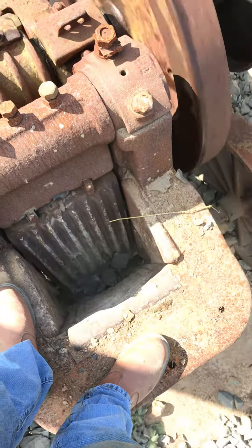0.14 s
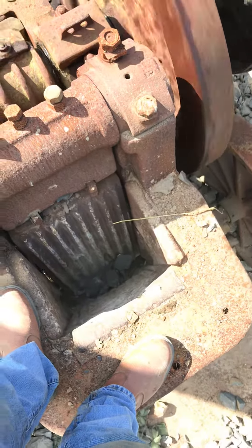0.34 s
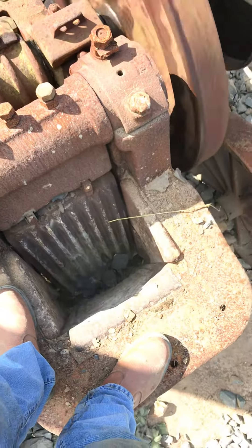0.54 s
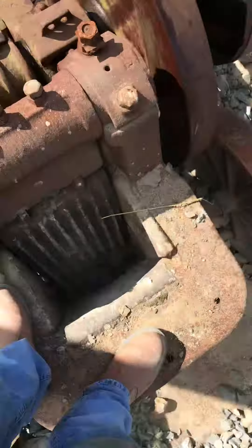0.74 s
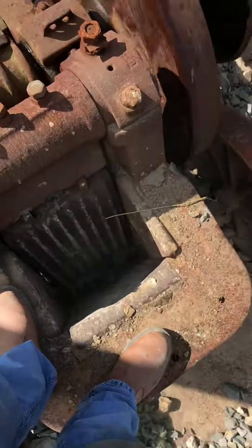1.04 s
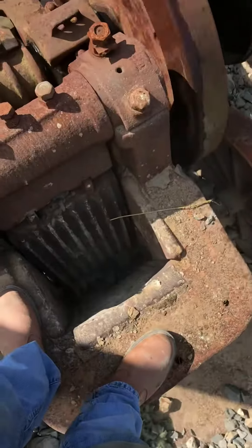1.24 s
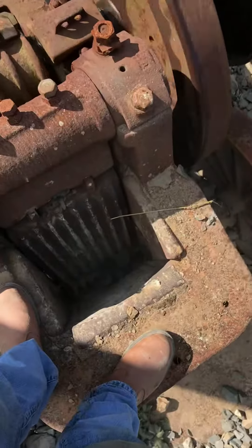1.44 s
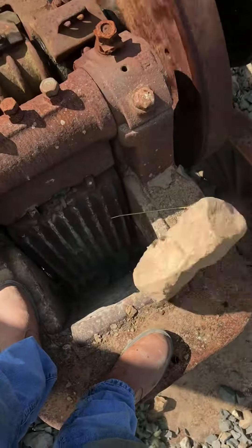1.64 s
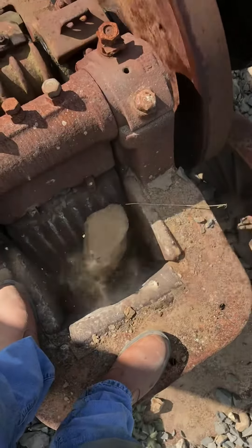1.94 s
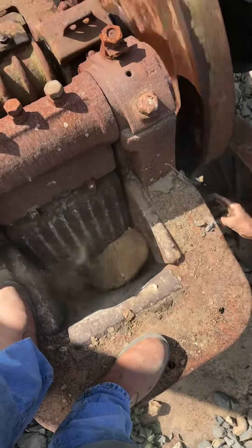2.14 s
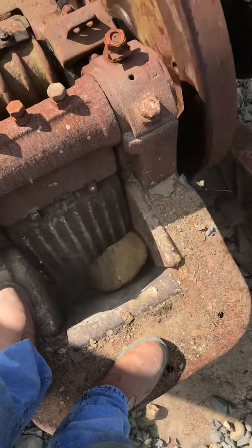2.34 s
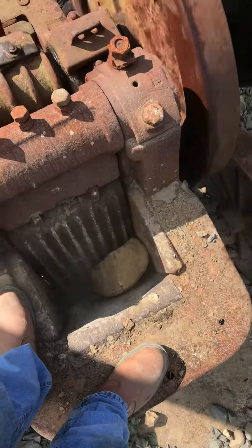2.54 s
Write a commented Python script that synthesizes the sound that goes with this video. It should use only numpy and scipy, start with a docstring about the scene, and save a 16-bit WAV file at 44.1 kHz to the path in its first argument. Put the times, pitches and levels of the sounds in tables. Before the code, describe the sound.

A jaw crusher pounds rock close by outdoors, dry, while a slow engine knocks five times a second over low rumble. Gritty crunches and iron thuds come near 0.2, 0.5, 0.86 (loudest, with growling rock slips), 1.15 and 1.48 s. From 1.7 to 2.1 s a thrown stone knocks and bounces hollowly, chips ticking. A heavy blow lands at 2.4 s, then softer grinding.

```python
"""Jaw crusher and slow engine

A jaw crusher runs outdoors, close by; its one-cylinder engine knocks and thumps five times a second.
About three times a second the jaw closes: grit grinds, rock slips, cracks and thuds in the iron frame,
and chips fly off. A thrown stone bounces down between the plates. Sources are damped modes, shaped noise
and short tones. The loudest blows drive the gain down and meet a fast limiter."""
import sys
import numpy as np
from scipy import signal
from scipy.fft import rfft, irfft, next_fast_len
from scipy.io import wavfile
from scipy.ndimage import uniform_filter1d, minimum_filter1d, map_coordinates

SR = 44100
rng = np.random.default_rng(int(sys.argv[2]) if len(sys.argv) > 2 else 0)


def master(y):
    """Save y as 16-bit WAV."""
    cut = np.clip(np.atleast_2d(y).T, -1, 1)
    pcm = np.round(cut * 32767)  # scale
    wavfile.write(sys.argv[1], SR, pcm.astype(np.int16))


N = 119070
T = np.arange(int(.3 * SR)) / SR  # time axis of one hit, s

# All levels are ahead of the microphone gain.
# drive hum: pitch_hz, level_db
HUM_TONES = [(112, -40.5)]
# rumble spectrum: freq_hz, gain_db
RUMBLE_SPECTRUM = [(24, -57), (48, 16.5), (100, 15.5), (160, 8.5), (400, 8), (750, 2), (2500, -18),
                   (7000, -25.5), (15500, -19.5)]
HUM_WAVER_HZ = 1.4
RUMBLE_DB, RUMBLE_SWAY_DB = -33.5, 3

# engine firings: start_s
FIRINGS = [0.102, .304, 0.507, 0.711, .911, 1.111, 1.311, 1.512, 1.712, 1.910, 2.106, 2.302, 2.499, 2.691]
# engine block modes: pitch_hz, level_db
BLOCK_MODES = [(614, 6), (795, 1), (950, -9), (1560, -13.5), (1810, -4.5), (2340, -9), (2930, -9),
               (3220, -7), (3460, -12.5), (4690, -14.5)]
# engine clatter spectrum: freq_hz, gain_db
CLATTER_SPECTRUM = [(100, 18), (300, 8), (800, 8), (1400, 3), (4800, -8), (8000, -13), (15000, -60)]
# exhaust puff and its reflection: delay_s (after firing), width_s, level_db
PUFFS = [(0.0226, 0.0018, -16), (0.033, 0.0027, -16)]
BLOCK_DB, BLOCK_T60_S = -23.5, 0.14
CLATTER_DB, CLATTER_T60_S = -20.5, 0.15

# jaw closings: middle_s, half_width_s (to 1/e), grinding_db
BITES = [(0.213, 0.05, -30), (0.537, 0.049, -28.5), (0.86, 0.046, -29), (1.145, 0.045, -30),
         (1.486, 0.043, -28.5), (1.818, 0.078, -34), (2.413, 0.06, -31.5), (2.70, 0.086, -38)]
GRIT_PER_S, GRIT_SPREAD_DB = 910, 6
IDLE_GRIT_DB, GROAN_DB = -43.5, 8  # groan re grit

# rock slipping on the plates: start_s, level_db, pitch_hz, swell_s (to peak)
SLIPS = [(.458, -18.5, 414, 0.0051), (.480, -10.5, 428, 0.0094), (0.504, -8, 433, .012),
         (.528, -15, 248, 0.013), (.781, -25.5, 405, 0.011), (.817, -11.5, 448, 0.0043),
         (.836, -5, 237.5, 0.018), (1.444, -14.5, 406, 0.0083)]
SLIP_WAVER_SHARE, SLIP_OVERTONE_DB = 0.07, -17.5

# flying chips: start_s, level_db, pitch_hz
CHIPS = [(0.174, -34, 7400), (0.822, -27, 14000), (0.925, -31, 5900), (0.975, -37.5, 5940),
         (1.256, -26.5, 9300), (1.815, -28, 5320), (2.1025, -18, 4480), (2.195, -34, 3560),
         (2.606, -19.5, 4510)]
CHIP_OCTAVES, CHIP_T60_S, CHIP_PING_DB = 1, 0.014, -5.5  # ping re tick

# thrown stone's contacts: start_s, knock_db, pitch_hz, crack_db
BOUNCES = [(1.7141, -12, 770, -25.5), (1.815, -17.5, 462, -27.5), (1.848, -11, 414, -21),
           (1.852, -7, 1018, -10.5), (1.932, -15.5, 565, -32), (1.9615, -13, 751, -26),
           (2.0249, -10, 720, -33), (2.046, -21, 825, -49), (2.0801, -9.5, 955, -31.5),
           (2.1035, -12.5, 776, -19)]
# stone knock partials: pitch_ratio, level_db
KNOCK_PARTIALS = [(.36, -2), (.62, -5), (1, 3), (1.35, -4), (1.8, -14.5)]
KNOCK_DECAY_S = 0.0015  # time constant
KNOCK_FRAME_DB, CONTACT_DB = -2.5, -21  # re knock

# jaw blows on rock: start_s, thud_db, thud_centre_hz, crack_db
BLOWS = [(.165, -15.5, 505, -21.5), (.182, -13, 318, -15), (.206, -19, 543, -13.5),
         (.219, -12.5, 660, -7.5), (0.2349, -16.5, 300, -15), (.461, -20.5, 900, -29.5),
         (.514, -12, 880, -21.5), (.578, -19, 290, -16.5), (.633, -27, 750, -60), (.843, -8.5, 470, -24.5),
         (.860, 0.5, 470, -15.5), (.872, -7, 775, -16), (1.137, -7, 305, -13.5), (1.163, -9, 452, -14.5),
         (1.170, -13.5, 690, -16), (1.193, -9, 340, -25.5), (1.4737, -12, 468, -20),
         (2.127, -13.5, 294, -31), (2.3754, -4, 298, -13), (2.383, -6.5, 970, -22), (2.405, -11, 600, -18)]
# crusher frame modes: pitch_hz, level_db
FRAME_MODES = [(178, -14), (220, 2.5), (247, 3), (290, -11), (352, -3), (392, -4), (432, -4.5), (525, -21),
               (690, -9.5), (812, -8), (1240, -15.5), (1385, -8)]
# crack spectrum: freq_hz, gain_db
CRACK_SPECTRUM = [(60, -11), (700, 5), (2000, 4), (3000, -2), (4500, -0.5), (8000, -10), (15500, -8)]
FRAME_T60_S = 0.086
THUD_OCTAVES, THUD_RISE_S = 1, 0.00059
THUD_NOISE_DB, THUD_NOISE_T60_S = -2.5, 0.14
CRACK_T60_S, CRACK_TAIL_DB, CRACK_TAIL_T60_S = 0.003, -1, 0.046
CRACKLE_DB, CRACKLE_PER_S = 5.5, 800
SHARD_RIPPLE_DB, SHARD_RIPPLE_HZ = 3.5, 280

MIC_DIP_HZ, MIC_DIP_SHARE, MIC_DIP_OCTAVES = 10690, 0.49, 0.12  # treble hollow
MIC_GAIN_DB = 2.5
DUCK_ABOVE_RMS, DUCK_SLOPE = 0.25, 0.36  # slope: dB of cut per dB over
DUCK_S_PER_NEPER = 1  # recovery of the held excess
LIMITER_SAMPLES, TOP_HZ = 65, 15900


def amp(db):
    """Decibels to amplitude."""
    return 10 ** (np.asarray(db) / 20)


def unit(x):
    """Scale to rms 1."""
    return x / np.sqrt(np.mean(x ** 2) + 1e-20)


def burst(x):
    """Scale a hit to the energy of 10 ms at rms 1."""
    return x / np.sqrt(np.sum(x ** 2) / (.01 * SR) + 1e-20)


def fade(t60_s):
    """Exponential decay, 60 dB in t60_s."""
    return np.exp(-np.log(1000) * T / t60_s)


def colour(points):
    """Gain over frequency through (Hz, dB) points."""
    freq_hz, gain_db = np.transpose(points)
    return lambda hz: amp(np.interp(np.log(hz + 1), np.log(freq_hz), gain_db))


def bell(centre_hz, octaves):
    """Gain of a hump around a frequency."""
    return lambda hz: 1 / (1 + (np.log2((hz + 1) / centre_hz) / octaves) ** 2 / 2) ** 3


def shard(gain):
    """Each piece of rock adds its own random resonances to a spectrum."""
    knots = rng.standard_normal(256)

    def rippled(hz):
        ripple = map_coordinates(knots, [hz / SHARD_RIPPLE_HZ], mode="wrap")
        return gain(hz) * amp(SHARD_RIPPLE_DB * np.minimum(hz / 2000, 1) * ripple)
    return rippled


def filtered(x, gain):
    """Apply a gain over frequency."""
    m = next_fast_len(len(x) + 4096)
    return irfft(rfft(x, m) * gain(np.fft.rfftfreq(m, 1 / SR)), m)[:len(x)]


def noise(gain, size):
    """Coloured noise of rms 1."""
    return unit(filtered(rng.standard_normal(size), gain))


def wobble(knots_per_s):
    """Smooth random curve through normal knots."""
    return map_coordinates(rng.standard_normal(200), [np.arange(N) * knots_per_s / SR], mode="wrap")


def add(track, start_s, sound):
    """Mix a sound into a track."""
    part = track[max(round(start_s * SR), 0):][:len(sound)]
    part += sound[:len(part)]


def ring(modes, t60_s, weight, blur):
    """Damped modes with varied strike levels; rattling contact blurs each by a share of its pitch."""
    hz, db = np.transpose(modes)
    gains = amp(db + rng.normal(0, 2, len(hz))) * weight(hz)
    steps = rng.standard_normal((len(hz), len(T))) * np.sqrt(2 * np.pi * blur * hz[:, None] / SR)
    phases = rng.uniform(0, 2 * np.pi, (len(hz), 1)) + np.cumsum(steps, axis=1)
    return gains @ (np.sin(2 * np.pi * hz[:, None] * T + phases) * fade(t60_s))


def thud(centre_hz):
    """The frame rings around the frequency that the contact favours."""
    weight = bell(centre_hz, THUD_OCTAVES)
    dense = burst(noise(weight, len(T)) * fade(THUD_NOISE_T60_S))
    modes = burst(ring(FRAME_MODES, FRAME_T60_S, weight, blur=0.0029))
    rise = 1 - np.exp(-T / THUD_RISE_S)
    return burst((modes + amp(THUD_NOISE_DB) * dense) * rise)


def crack():
    """Rock snaps, and its splinters crackle on briefly in the jaw chamber."""
    splinters = unit(amp(CRACKLE_DB * wobble(CRACKLE_PER_S)[:len(T)]))
    tail = amp(CRACK_TAIL_DB) * splinters * fade(CRACK_TAIL_T60_S)
    return burst(noise(shard(colour(CRACK_SPECTRUM)), len(T)) * (fade(CRACK_T60_S) + tail))


def drive():
    """Belt, flywheel and bearings: steady hum and uneven rumble."""
    out = np.zeros(N)
    for hz, db in HUM_TONES:
        level = amp(db + wobble(8.5))
        phase = 2 * np.pi * np.cumsum(hz + HUM_WAVER_HZ * wobble(12)) / SR
        out += level * np.sqrt(2) * np.sin(phase)
    rumble_level = amp(RUMBLE_DB + RUMBLE_SWAY_DB * wobble(20))
    return out + rumble_level * noise(colour(RUMBLE_SPECTRUM), N)


def engine(rise_s=0.0045, puff_skew=0.066):
    """Each firing knocks the block; the exhaust puffs follow as pressure pulses."""
    out = np.zeros(N)
    for start_s in FIRINGS:
        knock = amp(BLOCK_DB) * ring(BLOCK_MODES, BLOCK_T60_S, np.ones_like, blur=0.0093)
        clatter = amp(CLATTER_DB) * noise(colour(CLATTER_SPECTRUM), len(T)) * fade(CLATTER_T60_S)
        add(out, start_s, (knock + clatter) * (1 - np.exp(-T / rise_s)))
        for delay_s, width_s, puff_db in PUFFS:
            u = (T - delay_s) / width_s
            puff = (1 - 2 * u ** 2 - 2 * puff_skew * u) * np.exp(-u ** 2)
            add(out, start_s, amp(puff_db) * puff)
    return out


def grinding(groan_hz=420, grain_t60_s=0.046, grain_octaves=0.98):
    """Grit of many sizes crunches and the frame groans as the jaw closes; a little grit trickles between."""
    t = np.arange(N) / SR
    pressure = sum(amp(db) * np.exp(-((t - middle_s) / half_s) ** 2) for middle_s, half_s, db in BITES)
    grit, sizes_hz = np.zeros(N), np.geomspace(1200, 15000, 14)
    for hz in sizes_hz:
        hits = rng.random(N) < GRIT_PER_S / len(sizes_hz) / SR
        strengths = amp(GRIT_SPREAD_DB * np.minimum(rng.exponential(size=N), 4))
        grain = burst(noise(shard(bell(hz, grain_octaves)), len(T)) * fade(grain_t60_s))
        grit += signal.fftconvolve(hits * strengths, grain)[:N]
    groan = unit(signal.fftconvolve(rng.standard_normal(N), thud(groan_hz))[:N])
    return (pressure + amp(IDLE_GRIT_DB)) * unit(grit) + amp(GROAN_DB) * pressure * groan


def slips():
    """Rock sticks and slips on the plates: a short, rough growl that swells and dies away."""
    out = np.zeros(N)
    for start_s, db, hz, swell_s in SLIPS:
        pitch_hz = hz * (1 + SLIP_WAVER_SHARE * wobble(hz / 2)[:len(T)])
        phase = 2 * np.pi * np.cumsum(pitch_hz) / SR
        growl = np.sin(phase) + amp(SLIP_OVERTONE_DB) * np.sin(2 * phase)
        u = T / swell_s
        add(out, start_s, amp(db) * growl * (u * np.exp(1 - u)) ** 2)
    return out


def chips():
    """Splinters tick against the plates, each ringing briefly at its own pitch."""
    out = np.zeros(N)
    for start_s, db, hz in CHIPS:
        long_fade = fade(4 * CHIP_T60_S)
        tick = burst(noise(shard(bell(hz, CHIP_OCTAVES)), len(T)) * (fade(CHIP_T60_S) + .2 * long_fade))
        ping = burst(noise(bell(hz, .04), len(T)) * long_fade)
        add(out, start_s, amp(db) * (tick + amp(CHIP_PING_DB) * ping))
    return out


def stone(frame_ratio=0.76, contact_hz=12000):
    """The thrown stone ticks and knocks hollowly at each contact, ringing the frame at a lower pitch."""
    out, u = np.zeros(N), T / KNOCK_DECAY_S
    for start_s, knock_db, hz, crack_db in BOUNCES:
        partials = np.zeros(len(T))
        for ratio, db in KNOCK_PARTIALS:
            partials += amp(db) * np.sin(2 * np.pi * (ratio * hz * T + rng.random()))
        knock = burst(partials * u ** 2 * np.exp(-u))
        tick = amp(CONTACT_DB) * burst(noise(bell(contact_hz, 0.85), len(T)) * np.exp(-u))
        frame = amp(KNOCK_FRAME_DB) * thud(frame_ratio * hz)
        add(out, start_s, amp(knock_db) * (knock + tick + frame) + amp(crack_db) * crack())
    return out


def jaw():
    """Each blow of the jaw thuds in the frame and cracks the rock."""
    out = np.zeros(N)
    for start_s, thud_db, hz, crack_db in BLOWS:
        add(out, start_s, amp(thud_db) * thud(hz) + amp(crack_db) * crack())
    return out


def scene():
    """The machine in the open air, one channel."""
    return (drive() + engine() + grinding() + slips() + chips() + stone() + jaw())[None]


def record(dry):
    """Treble hollow, gain ducking after loud blows, fast peak limiter, band limit."""
    x = filtered(dry[0], lambda hz: 1 - MIC_DIP_SHARE * bell(MIC_DIP_HZ, MIC_DIP_OCTAVES)(hz))
    rms = np.sqrt(np.abs(uniform_filter1d(x ** 2, size=441)) + 1e-12)
    # hold the log excess, letting it fall linearly
    recovery = np.arange(N) / SR / DUCK_S_PER_NEPER
    held = np.maximum.accumulate(np.log(rms / DUCK_ABOVE_RMS) + recovery) - recovery
    x = amp(MIC_GAIN_DB) * x * np.exp(-DUCK_SLOPE * np.maximum(held, 0))
    needed = minimum_filter1d(1 / np.maximum(np.abs(x), 1), size=LIMITER_SAMPLES)
    limited = x * uniform_filter1d(needed, size=LIMITER_SAMPLES)
    return filtered(limited, lambda hz: hz < TOP_HZ)[None]


dry = scene()
out = record(dry)
master(out)
```